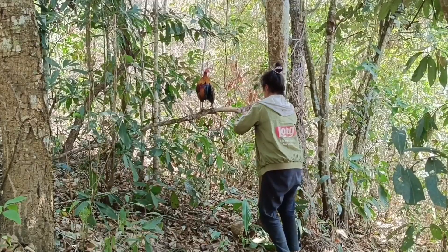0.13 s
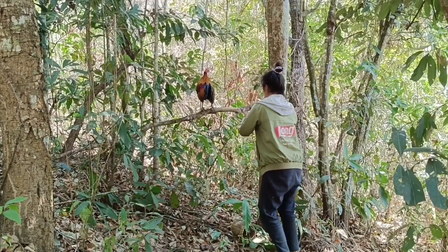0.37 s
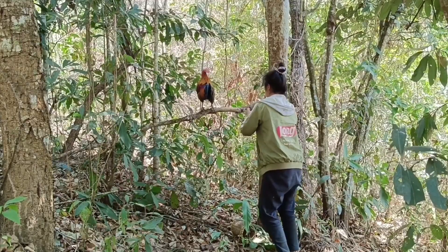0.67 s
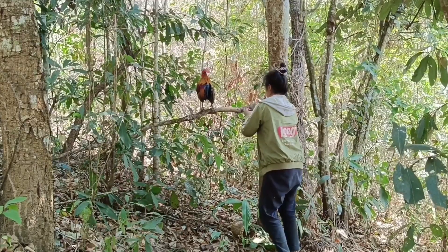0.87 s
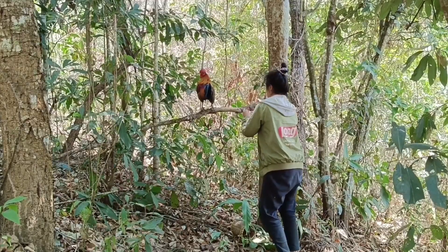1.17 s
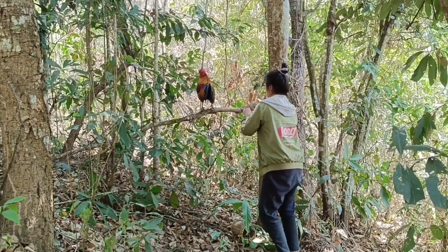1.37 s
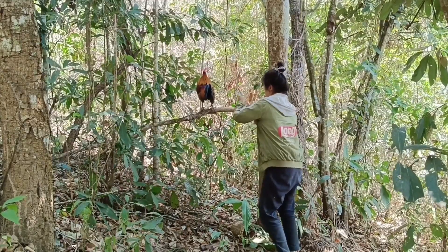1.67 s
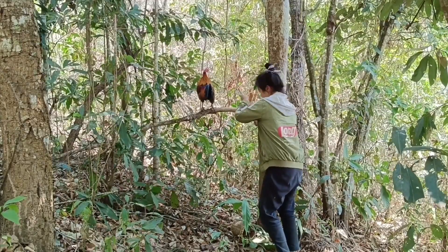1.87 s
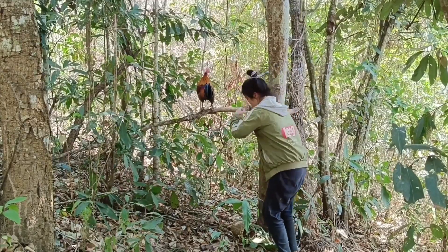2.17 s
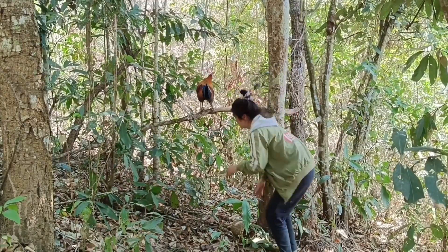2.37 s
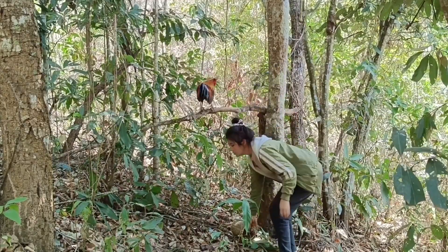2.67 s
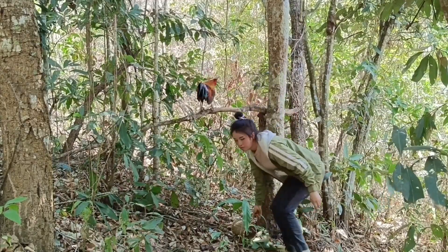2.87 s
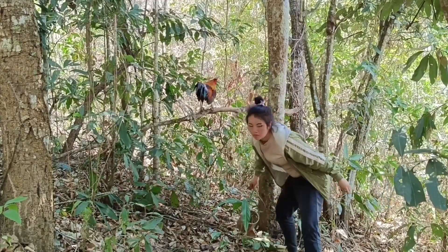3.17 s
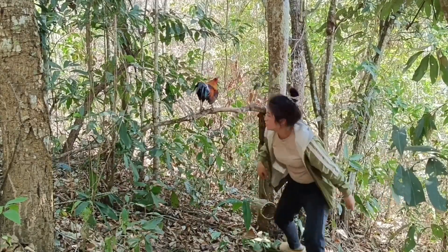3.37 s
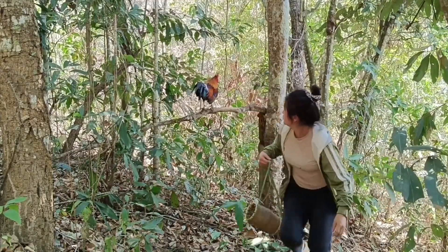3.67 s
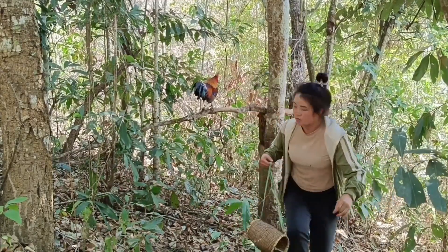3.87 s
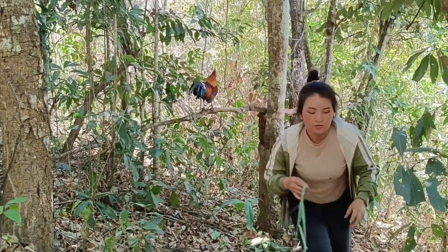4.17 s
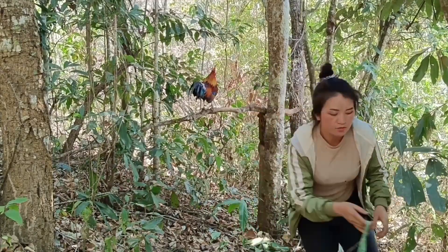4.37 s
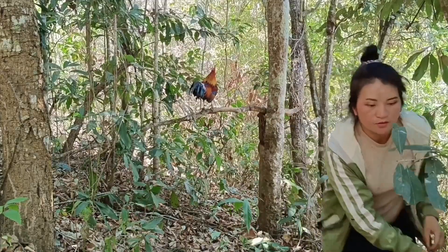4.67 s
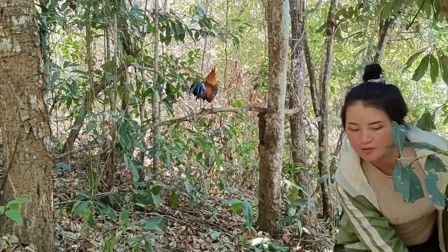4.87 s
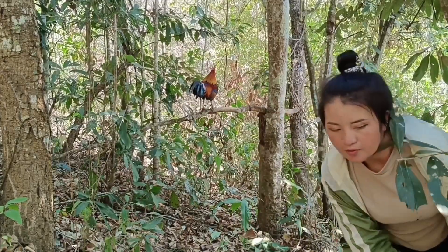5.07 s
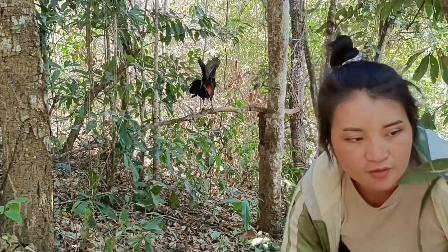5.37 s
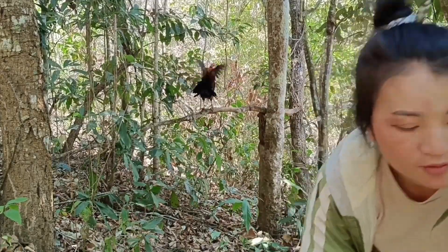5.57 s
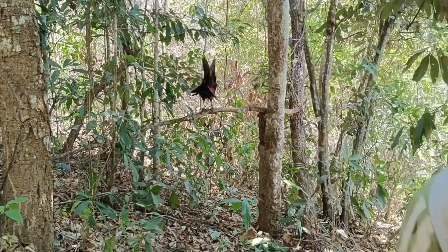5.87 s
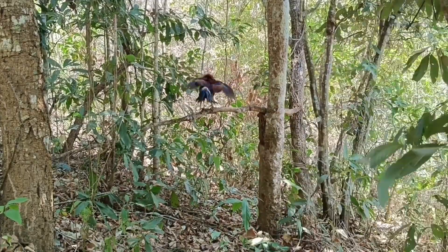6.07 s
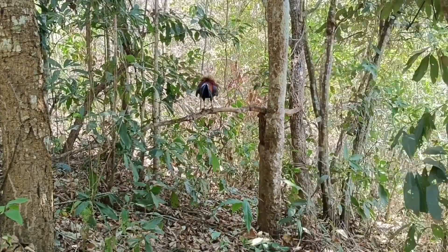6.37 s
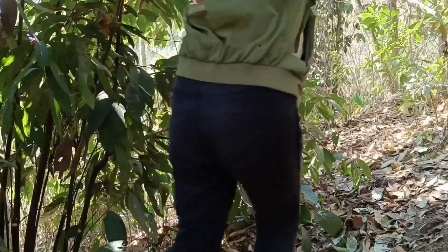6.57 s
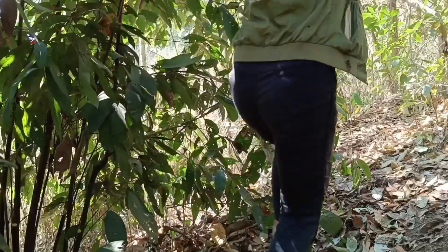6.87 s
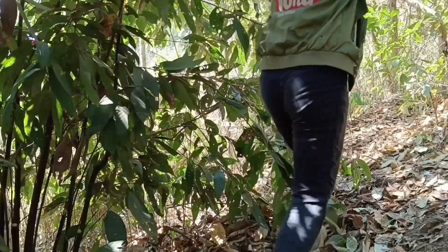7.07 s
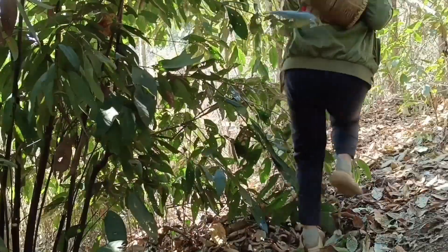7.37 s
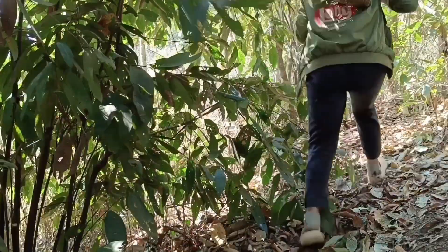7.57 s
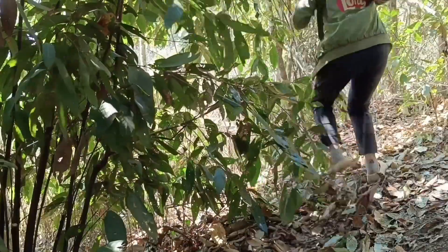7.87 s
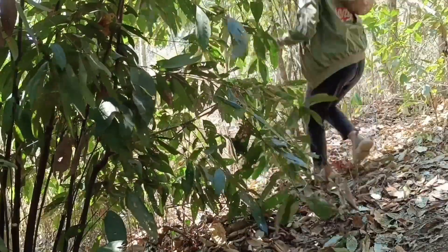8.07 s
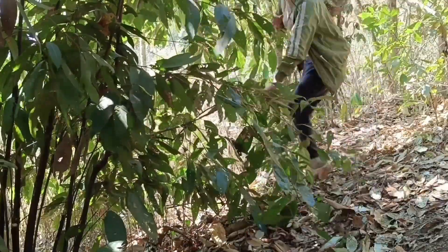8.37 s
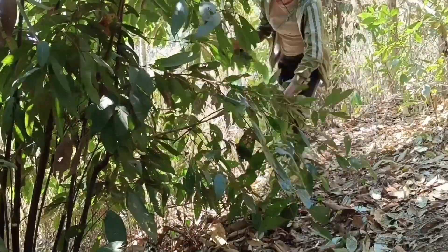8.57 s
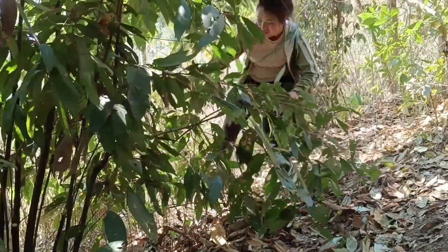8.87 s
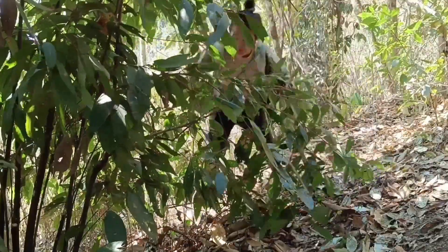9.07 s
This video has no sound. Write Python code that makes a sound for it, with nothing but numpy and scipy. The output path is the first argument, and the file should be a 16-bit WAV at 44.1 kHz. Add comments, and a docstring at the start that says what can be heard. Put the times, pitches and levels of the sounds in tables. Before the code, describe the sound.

Outdoors among trees, a stereo microphone picks up airy foliage hiss with thin insect noise. After a quiet start, a walker bends and sets off, crushing brittle leaves, cracking sticks and brushing stems, loudest as they pass close by. The hiss sinks beneath the loud steps. Faint soft wing slaps come midway; after a tiny dropout and click, footsteps recede with gaps, rustles and final sharp twig cracks.

```python
"""A dry forest hisses around the microphone; a walker stands, then treads through dead leaves and twigs.
The walker passes close by the microphone and goes away up a slope; a perched rooster flaps, a far bird chirps.
The hiss follows a written curve: it sinks as the gain ducks and recovers after; a brief dip ends in a bare tick.
Steps are clumps of tiny fractures, twigs and heels damped tones with noise, wing beats slaps of noise, chirps
wavering sines, scuffs and puffs swells of noise; trunks scatter a short tail and the ground adds an echo."""
import sys
import numpy as np
from scipy import signal
from scipy.fft import rfft, irfft, next_fast_len
from scipy.io import wavfile
from scipy.ndimage import uniform_filter1d

SR = 44100
rng = np.random.default_rng(int(sys.argv[2]) if len(sys.argv) > 2 else 0)


def output_pcm(signal):
    """Save a mono or channel-first signal as 16-bit PCM at the path in sys.argv[1].

    Samples are clipped to [-1, 1] before scaling.
    """
    pcm = np.clip(np.atleast_2d(signal).T, -1, 1) * 32767
    wavfile.write(sys.argv[1], SR, np.round(pcm).astype(np.int16))


N = 406602
T = np.arange(N) / SR

# Level of the hiss as the gain ducks and recovers: (time [s], level [dB])
HISS_LEVEL = [(0, -28.5), (.7, -27), (2.4, -26.5), (2.9, -29.5), (3.8, -35), (4.2, -36), (4.7, -39),
              (5.7, -41.5), (6.5, -47), (7, -39.5), (9.2, -35)]
# Relative spectrum of the far foliage: (frequency [Hz], density [dB per Hz])
FOREST_SPECTRUM = [(18, -36), (30, -16), (123, -6), (225, 1.5), (332, -5), (1110, -13), (2360, -11.5),
                   (3070, -6.5), (4310, -18.5), (5740, -11), (7460, -25), (9680, -27.5), (11300, -37),
                   (12900, -28.5), (15500, -32)]
# Likeness of the foliage at the two sides: (frequency [Hz], correlation [-1 to 1])
FOREST_LIKENESS = [(60, 0.47), (300, 0.73), (520, 0.44), (850, -0.11), (1450, -0.34), (2200, 0.0087),
                   (15000, -0.042)]

# Twigs snapping: (time [s], starting level [dB], pitch [Hz], splinters against the wood [dB])
TWIG_SNAPS = [(0.268, -14.5, 2480, -25), (2.8217, -10, 1500, 0), (2.831, -6, 950, -6),
              (2.8405, -18, 1200, 9), (2.9592, -10, 3050, -24), (3.145, -11, 3300, -15),
              (3.478, -19, 1000, -20), (3.8973, -12, 2000, 1), (3.970, -8.5, 1880, 6),
              (4.049, -16, 3000, 22), (4.308, -13.5, 1190, -6), (4.352, -7.5, 1310, -15),
              (4.39, -7, 1380, -5), (4.609, -13, 1480, -30), (4.7732, -7, 2970, -14),
              (4.815, -21, 2400, -12), (4.918, -4, 3000, -12), (5.013, -12.5, 1590, -16),
              (5.064, -14.5, 1730, -17), (5.297, -6, 6000, 5), (5.311, -6, 1250, 1), (5.884, -2, 2860, -10),
              (6.081, -6, 3400, -5), (6.2537, -5.5, 3040, -7), (6.314, -8, 2530, -5),
              (6.653, -20, 3000, -8), (6.994, -20.5, 2420, -18), (7.159, -24.5, 1440, -15),
              (7.678, -8, 4000, -17), (7.821, -15, 1950, 7), (8.926, -4.5, 2500, -4),
              (9.06, -8.5, 3150, -17)]
SNAP_T60_S, THIN_DIES_SOONER = 0.02, 0.54   # ring of a 1 kHz twig; power by which it shortens with pitch
SNAP_CRACK_DB = -3   # the first sharp crack against the noisy ring of the wood

# The walker's bearing, by how much sooner the right side hears: (time [s], lead of the right [ms])
WALKER_BEARING = [(2.5, 0.085), (4.3, .11), (4.85, 0.18), (5.45, 0.18), (6.4, .29), (6.7, 0.085),
                  (7.6, 0.12), (9.2, 0.073)]
WALKER_PAN_DB = -1.5   # left minus right, in the highs
ECHO_MS, ECHO_PER_LEAD, ECHO_DB = 1.7, 3.5, -25   # the ground echo comes sooner as the bearing widens

# Soles and sleeves dragging over stiff leaves: (middle [s], half-length to 1/e [s], level [dB], pitch [Hz])
SCUFFS = [(0.702, 0.041, -31.5, 654), (2.62, 0.049, -40, 1860), (2.65, 0.056, -23.5, 3000),
          (3.11, 0.076, -20.5, 3420), (3.49, 0.067, -24, 980), (3.654, 0.034, -21, 2790),
          (4.346, .024, -21, 1130), (4.906, .043, -30, 280), (5.45, 0.079, -31.5, 314),
          (5.974, 0.056, -24, 960), (6.378, 0.048, -18.5, 3080), (6.724, 0.055, -34, 1000)]
SCUFF_WIDTH_HZ = 330   # width of a resonance at 1 kHz; it grows with the root of the pitch

# Puffs of air on the microphone: (middle [s], half-length to 1/e [s], nominal level [dB])
AIR_PUFFS = [(0.782, 0.1, -32), (2.68, 0.099, -34.5), (3.323, .05, -37), (3.437, 0.031, -32),
             (4.004, 0.028, -34), (4.53, 0.043, -44), (6.98, 0.038, -32.5)]
# Faint chirps of a far bird: (middle [s], peak [dB], pitch [Hz])
BIRD_CHIRPS = [(1.59, -35, 5250), (1.69, -33.5, 5300), (1.785, -32, 5250)]

# The disturbed undergrowth keeps rustling: (time [s], nominal level of the leaves [dB])
UNDERGROWTH_STIR = [(2.45, -29), (2.75, -27), (2.92, -32.5), (3.25, -25), (3.8, -32.5), (4.25, -35),
                    (4.7, -44), (5.08, -27), (5.5, -20.5), (5.65, -36.5), (5.82, -37), (6.08, -25),
                    (6.28, -24.5), (6.55, -49), (6.85, -36.5), (7.1, -40), (7.45, -31), (9.2, -29)]
# A foot comes down: (start [s], rise [s], hold [s], nominal level of crackling leaves [dB],
# weight: pressed litter against the leaves [dB])
STEPS = [(2.515, 0.091, 0.024, -17.5, -10), (2.659, 0.038, 0.0093, -16.5, -19),
         (2.787, 0.029, 0.023, -20.5, -12), (3.325, 0.1, 0.092, -14, -21),
         (3.595, 0.052, 0.038, -15.5, -20), (4.301, 0.042, .033, -15.5, -6),
         (4.812, 0.0054, .13, -13, -9.5), (4.953, 0.058, 0.027, -17, -13.5),
         (5.306, .005, 0.084, -15.5, -9), (5.362, 0.037, 0.058, -13.5, -8.5),
         (5.474, 0.025, 0.045, -17, -12), (5.869, 0.019, 0.11, -12.5, -12), (5.987, 0.034, 0.048, -20, -6),
         (6.316, .04, 0.074, -11.5, -6), (6.655, 0.042, 0.032, -16.5, -13.5),
         (7.229, 0.059, 0.023, -23, -4.5), (7.338, 0.034, 0.035, -25.5, -17),
         (7.766, 0.046, 0.0097, -17, -8), (7.875, 0.073, 0.024, -19, -13.5), (8.088, .04, 0.11, -25.5, -8),
         (8.211, 0.05, 0.034, -18.5, -7), (8.795, 0.034, 0.12, -22, -12.5)]
# A leg brushes through leaves between steps: (start [s], rise [s], hold [s], nominal level of leaves [dB])
LEG_BRUSHES = [(3.008, 0.057, 0.092, -18.5), (3.857, 0.031, .008, -23.5), (3.954, .015, 0.011, -23.5),
               (4.76, 0.0089, 0.0065, -23.5), (5.14, 0.028, 0.047, -20), (6.837, .03, .01, -30.5),
               (7.655, 0.017, 0.017, -26)]
BRUSH_WEIGHT_DB, STIR_WEIGHT_DB = -26.5, -13.5   # pressed litter against the leaves
RISE_DB = 14.5   # a crunch grows by this much during its rise
SINK_DB_PER_S = 26   # while the foot bears down it presses ever deeper into the litter
FALL_DB_PER_S, FALL_FOLLOWS = 478, 0.32   # dying away at weight 0 dB; lighter treads die more slowly
STALK_DB, STALK_FOLLOWS = -5, 0.38   # stalks against the leaves at weight 0 dB; their share of the weight
LEAF_SPREAD_DB, LEAF_T60_S = 1.8, .0077   # how much single leaf breaks differ, and how long each lasts

# Relative spectrum of the litter pressed down: (frequency [Hz], density [dB per Hz])
LITTER_SPECTRUM = [(30, -44), (80, -15), (120, -12), (180, -2.5), (260, 3), (370, -3.5), (520, -9.5),
                   (800, -10), (1500, -37)]
# Relative spectrum of cracking stalks: (frequency [Hz], density [dB per Hz])
STALK_SPECTRUM = [(60, -50), (250, -25), (450, -4), (600, -1), (1050, 3.5), (1450, -3.5), (1900, 5),
                  (2300, -17), (3200, -13.5), (6000, -44)]
# Relative spectrum of crushed leaves: (frequency [Hz], density [dB per Hz])
LEAF_SPECTRUM = [(200, -82), (1000, -24), (1900, -8.5), (2400, -8), (2850, -1.5), (3400, -2), (4200, -9.5),
                 (5100, -9), (6500, -11.5), (8000, -11.5), (10500, -13), (13000, -9.5), (15500, -10.5)]

# Heels knocking on sticks and soil: (time [s], starting level before the band-pass [dB], pitch [Hz])
HEEL_KNOCKS = [(2.830, -13, 210), (3.532, -13, 694), (3.543, -15.5, 286), (4.392, -17, 300),
               (4.945, -7, 328), (5.364, -10.5, 750), (5.5826, -3.5, 790), (6.412, -10, 343),
               (6.427, -3.5, 505), (6.443, -6.5, 403), (6.508, -32, 700), (6.527, -34, 600),
               (7.303, -16.5, 190), (7.821, -19.5, 170), (8.271, -13, 240), (8.311, -10.5, 170),
               (8.3121, -3, 550)]
KNOCK_CYCLES = 13.3   # swings until a knock has fallen 60 dB
# Wing beats of the rooster: (time [s], peak [dB])
WING_BEATS = [(5.608, -40), (5.678, -33), (5.718, -28.5), (5.762, -37)]

DIP_S, DIP_DB = .031, -39   # the level dips briefly just before the tick
TICK_S, TICK_DB = 6.5762, 4   # one bare tick ends the dip
# Hollows in the microphone's response: (frequency [Hz], width [Hz])
MIC_NOTCHES = [(8950, 730), (11300, 1270)]
CUTOFF_HZ = 15550   # top of the microphone's range


def from_db(db):
    """Decibels to gain."""
    return 10 ** (np.asarray(db) / 20)


def rms_one(x):
    """Scale to unit rms."""
    return x / np.sqrt(np.mean(x ** 2) + 1e-20)


def in_time(rows):
    """Each column of a curve at every sample."""
    s, *columns = np.transpose(rows)
    return [np.interp(T, s, column) for column in columns]


def at_hz(points, hz):
    """Read a spectrum on a log-frequency axis."""
    f, value = np.transpose(points)
    return np.interp(np.log(hz + 1), np.log(f), value)


def colour(x, spectrum, size=4096):
    """Causal (minimum-phase) filter with the given spectrum."""
    spectrum_db = at_hz(spectrum, np.fft.rfftfreq(size, 1 / SR))
    cepstrum = irfft(np.log(from_db(spectrum_db)))
    # folding the cepstrum forward makes the filter minimum-phase
    cepstrum[1:size // 2] *= 2
    cepstrum[size // 2 + 1:] = 0
    response = irfft(np.exp(rfft(cepstrum)))
    return signal.oaconvolve(x, response[None], axes=1)[:, :N]


def band(x, low_hz, high_hz, order=2):
    """Butterworth band-pass."""
    edges = [low_hz, min(high_hz, SR / 2 - 1000)]
    return signal.sosfilt(signal.butter(order, edges, "band", fs=SR, output="sos"), x)


def drift(rate):
    """Smooth chance of spread 1, renewed rate times a second."""
    chances = rng.standard_normal(N // 20)
    return rms_one(np.interp(T * rate, np.arange(N // 20), chances))


def fade(t60, size=4096):
    """Time and an envelope that falls 60 dB in t60 seconds."""
    t = T[:size]
    return t, np.exp(-np.log(1000) * t / t60)


def add(track, s, sound):
    """Mix a sound in at time s."""
    i = int(s * SR)
    track[..., i:i + sound.shape[-1]] += sound[..., :N - i]


def starting_at(db, sound, envelope):
    """Scale a dying sound so that its envelope starts at db."""
    return from_db(db) * rms_one(sound) * np.sqrt(np.mean(envelope ** 2))


def forest(insect_db, insect_hz, insect_width_hz):
    """Far foliage and distant insects hiss, their level sinking as the gain ducks and recovering after."""
    size = next_fast_len(N)
    alike = np.clip(at_hz(FOREST_LIKENESS, np.fft.rfftfreq(size, 1 / SR)), -.9, .9)
    # noise common to both sides, and noise of opposite sign, mixed to the wanted correlation
    mid, side = rfft(rng.standard_normal((2, size)))
    air = irfft(mid + np.sqrt((1 - alike) / (1 + alike)) * side * [[1], [-1]], size)[:, :N]
    foliage = rms_one(colour(air, FOREST_SPECTRUM)) * from_db(0.95 * drift(12))

    half_width = insect_width_hz / 2
    insects = rms_one(band(rng.standard_normal((2, N)), insect_hz - half_width, insect_hz + half_width))
    insects = insects * from_db(insect_db + 1.0 * drift(11))
    return from_db(in_time(HISS_LEVEL)[0]) * (foliage + insects)


def twigs(tone_db, crack_db):
    """A twig breaks with one sharp crack, then splinters while the wood rings briefly."""
    out = np.zeros(N)
    for s, db, hz, splinter_db in TWIG_SNAPS:
        t, envelope = fade(SNAP_T60_S * (hz / 1000) ** -THIN_DIES_SOONER)
        burst = rms_one(rng.standard_normal(len(t)) * envelope)
        crack = rms_one(band(1.0 * (t == 0), hz / 3.14, hz * 1.28, order=2))
        tone = rms_one(np.sin(2 * np.pi * hz * t) * envelope ** 2)
        wood = rms_one(band(burst, hz / 1.42, hz * 1.55)) + from_db(tone_db) * tone
        splinters = rms_one(band(burst, 3000, 19600, order=1))
        snap = wood + from_db(crack_db) * crack + from_db(splinter_db) * splinters
        add(out, s, starting_at(db, snap, envelope))
    return out


def place(x, shade_hz):
    """A ground echo hollows the sound as the feet move; the far side hears it later, with its highs shaded."""
    lead_ms, = in_time(WALKER_BEARING)
    echo_ms = ECHO_MS - ECHO_PER_LEAD * lead_ms
    dull = signal.sosfilt(signal.butter(1, 3500, fs=SR, output="sos"), x)
    echo = np.array([np.interp(T - echo_ms / 1000, T, channel) for channel in dull])
    x = x + from_db(ECHO_DB) * echo

    highs = signal.sosfilt(signal.butter(1, shade_hz, "high", fs=SR, output="sos"), x)
    pan = from_db([[WALKER_PAN_DB / 2], [-WALKER_PAN_DB / 2]])
    left, right = x + highs * (pan - 1)
    return np.array([np.interp(T - lead_ms / 1000, T, left), right])


def trees(x, wet_db, t60):
    """Trunks and foliage scatter a short, thin tail, different on each side."""
    t, envelope = fade(t60, size=16384)
    echo = band(rng.standard_normal((2, len(t))), 890, 16000, order=1) * envelope
    echo = echo * (t > .003)   # the nearest trunks answer after 3 ms
    echo /= np.sqrt(np.sum(echo ** 2, axis=1, keepdims=True))
    return from_db(wet_db) * signal.oaconvolve(x, echo, axes=1)[:, :N]


def scuffs(grain_db):
    """Uneven rubbing swells and fades in the broad resonance of whatever is dragged."""
    rubbing = rng.standard_normal(N) * from_db(grain_db * drift(400))
    out = np.zeros(N)
    for s, length, db, hz in SCUFFS:
        width = SCUFF_WIDTH_HZ * np.sqrt(hz / 1000)
        swell = np.exp(-((T - s) / length) ** 2)
        out += from_db(db) * swell * rms_one(band(rubbing, hz - width / 2, hz + width / 2))
    return out


def puffs():
    """Moving air rumbles on the microphone ports, more on the left."""
    swell = sum(from_db(db) * np.exp(-((T - s) / length) ** 2) for s, length, db in AIR_PUFFS)
    rumble = rms_one(band(rng.standard_normal((2, N)), 29, 60))
    return swell * rumble * from_db([[2], [-4]])


def bird(length_s, width_hz):
    """Short high notes swell and fade while their pitch wavers by chance."""
    waver = 2 * np.pi * np.cumsum(width_hz * drift(1100)) / SR
    out = np.zeros(N)
    for s, db, hz in BIRD_CHIRPS:
        swell = np.exp(-((T - s) / length_s) ** 2)
        out += from_db(db) * swell * np.sin(2 * np.pi * hz * T + waver)
    return out


def press(s, rise_s, hold_s, db, weight_db):
    """One contact swells, holds while the foot sinks in, and dies away: levels of leaves and of weight."""
    t = T[::32] - s
    fall = FALL_DB_PER_S * from_db(FALL_FOLLOWS * weight_db)
    rising_db = RISE_DB * np.minimum(t / rise_s - 1, 0)
    falling_db = fall * np.maximum(t - rise_s - hold_s, 0)
    leaf_db = np.maximum(db + rising_db - falling_db, -120)
    return leaf_db, weight_db + SINK_DB_PER_S * np.clip(t - rise_s, 0, hold_s)


def tread():
    """Steps, brushes and stirred undergrowth add in power; weight reaches the litter and stalks below."""
    contacts = [press(*row) for row in STEPS]
    contacts += [press(*row, BRUSH_WEIGHT_DB) for row in LEG_BRUSHES]
    contacts.append((in_time(UNDERGROWTH_STIR)[0][::32], STIR_WEIGHT_DB))
    power = 0
    for leaf_db, weight_db in contacts:
        litter_db = leaf_db + weight_db
        stalk_db = leaf_db + STALK_DB + STALK_FOLLOWS * weight_db
        power = power + from_db([litter_db, stalk_db, leaf_db]) ** 2
    return [np.interp(T, T[::32], 10 * np.log10(p)) for p in power]


def fractures(per_s, spread_db, t60, clump_db, scatter_ms, count=5):
    """Tiny breaks clump in patches of ground in several directions; each is a burst falling 60 dB in t60."""
    out = np.zeros((2, N))
    rate = per_s * from_db(clump_db * drift(150)) / count / SR   # breaks per sample and direction
    for direction in np.linspace(-1, 1, count):
        sizes = from_db(spread_db * np.minimum(np.abs(rng.standard_normal(N)), 2.8))
        sizes = sizes * (rng.random(N) < rate)
        energy = signal.lfilter([1], [1, -from_db(-120 / (t60 * SR))], sizes ** 2 + 1e-12)
        bursts = np.sqrt(energy) * rng.standard_normal(N)
        out += [bursts, np.roll(bursts, round(scatter_ms * direction / 1000 * SR))]
    return out


def crush(level_db, grains, spectrum, flutter_db):
    """Fractures take the colour of their material and follow the weight of the foot."""
    x = colour(grains, spectrum)
    # dividing by the slow level keeps only the grain of the sound
    steady = np.sqrt(uniform_filter1d(np.mean(x ** 2, axis=0), size=1400) + 1e-12)
    return x / steady * from_db(level_db + flutter_db * drift(70))


def footsteps():
    """Feet press litter, crack stalks and crush leaves; the harder the tread, the more breaks each second."""
    litter_db, stalk_db, leaf_db = tread()
    walking = np.clip((T - UNDERGROWTH_STIR[0][0]) / 0.11, 0, 1)
    effort = from_db(.5 * (leaf_db + 20.5))
    pressed = fractures(1200 * effort, 2.5, 0.012, 1.4, .05, count=3)
    litter = crush(litter_db - 4.0, pressed, LITTER_SPECTRUM, flutter_db=3.5)
    cracked = fractures(1100 * effort, 3.6, 0.018, 2.7, .1)
    stalks = crush(stalk_db, cracked, STALK_SPECTRUM, flutter_db=2.6)
    crumbled = fractures(6000 * effort, LEAF_SPREAD_DB, LEAF_T60_S, 1.5, .12, count=8)
    leaves = crush(leaf_db - 1.23, crumbled, LEAF_SPECTRUM, flutter_db=0.66)
    # a few stiff leaves break singly and stand out of the rustle
    breaks = band(fractures(220 * effort, 3.2, 0.02, 3, .09), 1300, 8400, order=1)
    stiff_leaves = crush(leaf_db - 8.0, breaks, LEAF_SPECTRUM, flutter_db=1.5)
    return walking * (litter + stalks + leaves + stiff_leaves)


def heels(grit_db):
    """A heel gives a few heavily damped swings of the ground, with grit in them."""
    out = np.zeros(N)
    for s, db, hz in HEEL_KNOCKS:
        t, envelope = fade(KNOCK_CYCLES / hz)
        grit = band(rng.standard_normal(len(t)) * envelope, hz / 1.6, hz * 2)
        swings = rms_one(np.sin(2 * np.pi * hz * t) * envelope ** 2)
        knock = swings + from_db(grit_db) * rms_one(grit)
        add(out, s, starting_at(db, knock, envelope))
    return band(out, 165, 4500, order=1)


def rooster(t60):
    """Each wing beat is a soft slap of feathers."""
    out = np.zeros(N)
    for s, db in WING_BEATS:
        t, envelope = fade(t60)
        slap = band(rng.standard_normal(len(t)) * envelope, 660, 2400)
        add(out, s, from_db(db) * slap / np.abs(slap).max())
    return out


def dip_and_tick(x):
    """The level dips briefly, and a single bare tick ends the dip."""
    dipping = (T > TICK_S - DIP_S) & (T < TICK_S)
    out = x * from_db(DIP_DB * dipping)
    add(out, TICK_S, from_db(TICK_DB) * fade(0.00011, size=64)[1])
    return out


def scene():
    """The walker and the birds among the trees."""
    contact = footsteps() + scuffs(grain_db=3.0)
    knocks = twigs(tone_db=-15, crack_db=SNAP_CRACK_DB) + heels(grit_db=-3)
    walker = place(contact + knocks, shade_hz=450)
    near = walker + rooster(t60=0.031) + bird(length_s=0.046, width_hz=500)
    hiss = forest(insect_db=-8.5, insect_hz=5720, insect_width_hz=910) * from_db([[-.4], [.4]])
    air = hiss + puffs()
    return dip_and_tick(near + trees(near, wet_db=-10.0, t60=0.05) + air)


def record(dry):
    """The microphone hollows two treble bands, its right port is brighter, peaks clip, the top is cut."""
    for hz, width_hz in MIC_NOTCHES:
        dry = signal.lfilter(*signal.iirnotch(hz, hz / width_hz, fs=SR), dry)
    dry = dry + band(dry, 13000, 14000, order=1) * (from_db([[-1.5], [2.0]]) - 1)
    top_cut = signal.ellip(10, .2, 80, CUTOFF_HZ, fs=SR, output="sos")
    return signal.sosfilt(top_cut, np.clip(dry, -.95, .95))


dry = scene()
out = record(dry)
output_pcm(out)
```